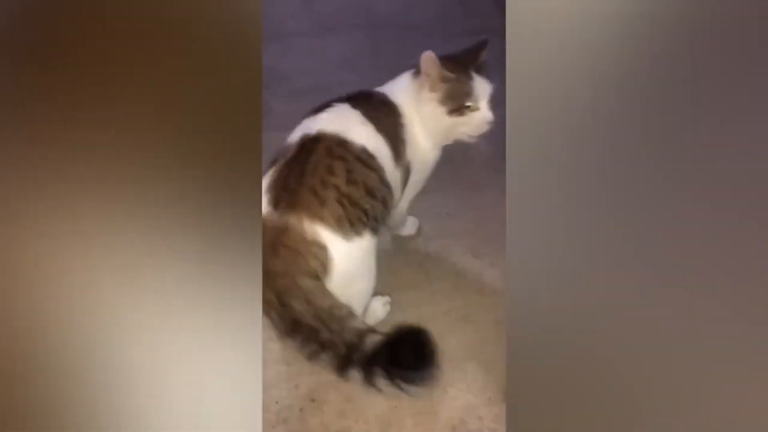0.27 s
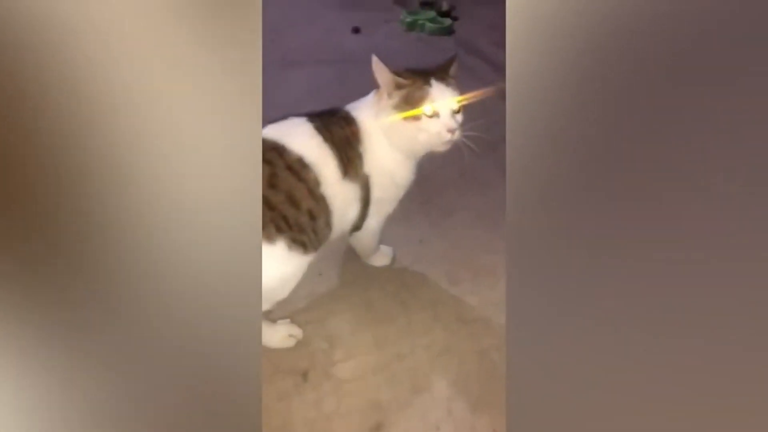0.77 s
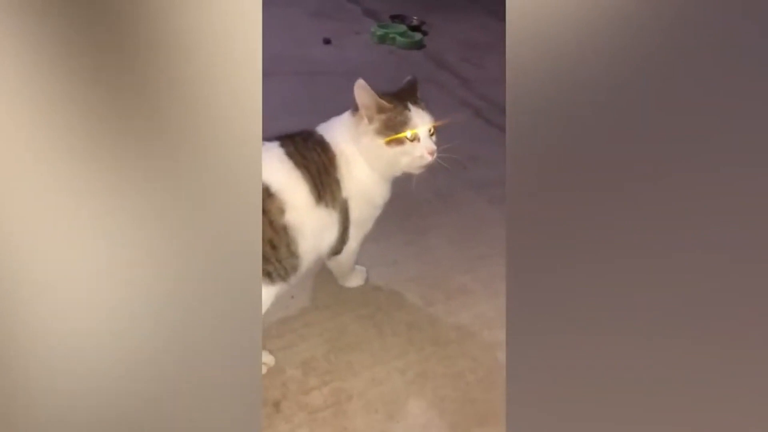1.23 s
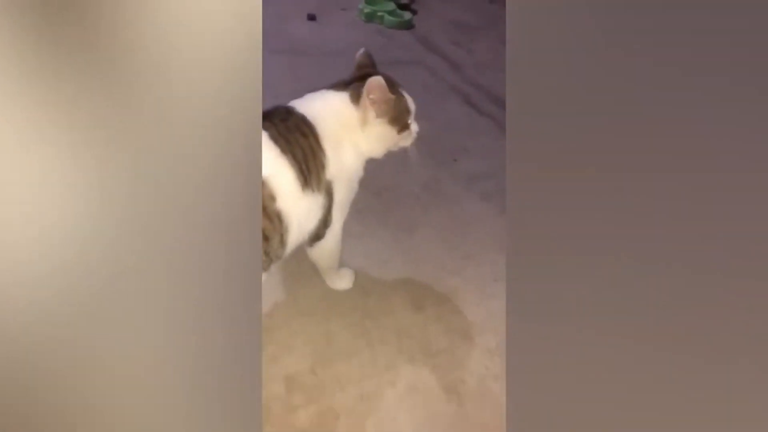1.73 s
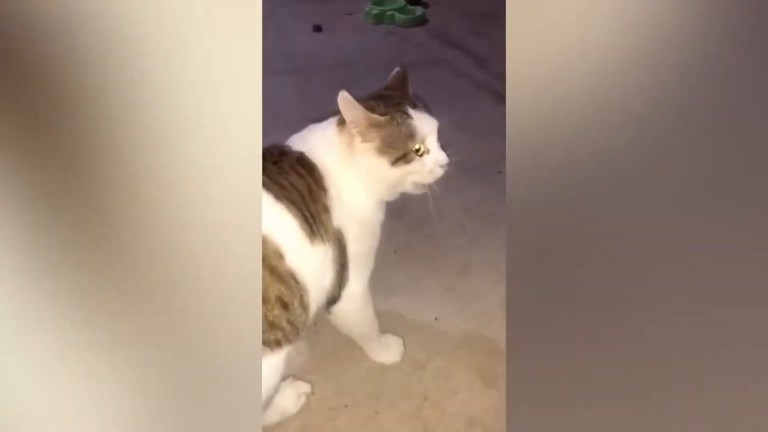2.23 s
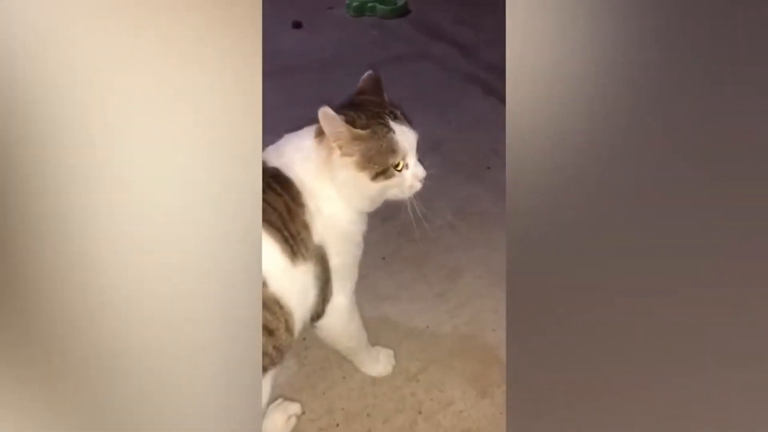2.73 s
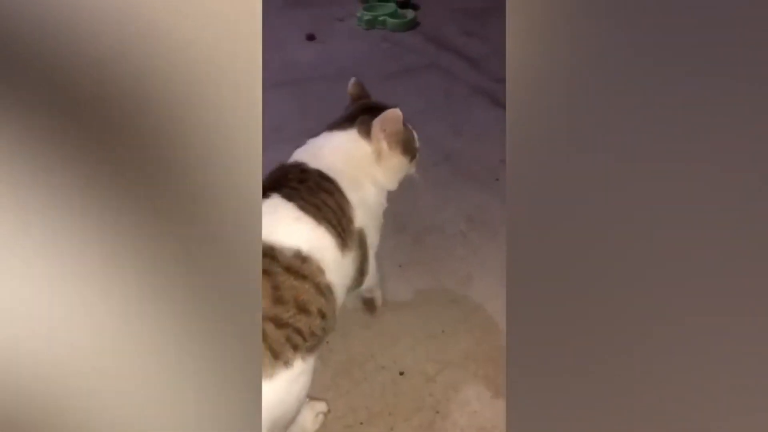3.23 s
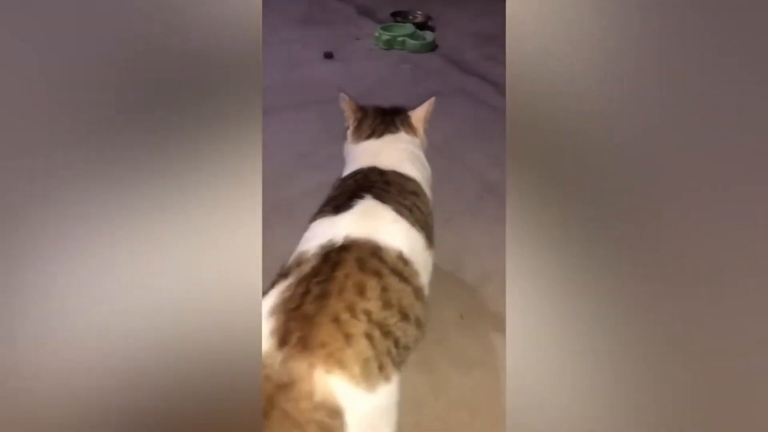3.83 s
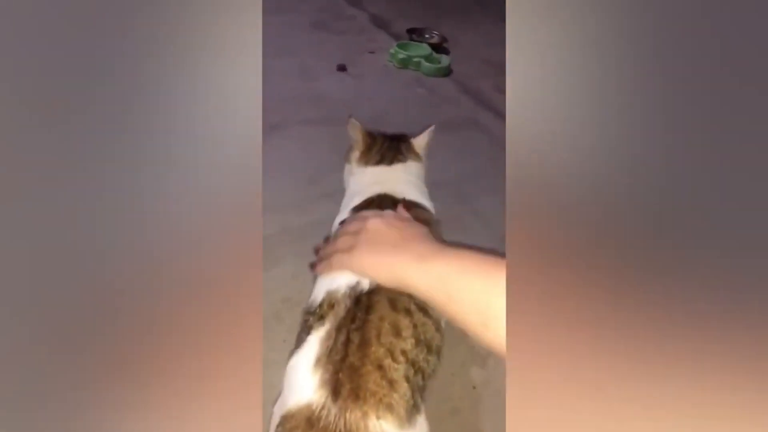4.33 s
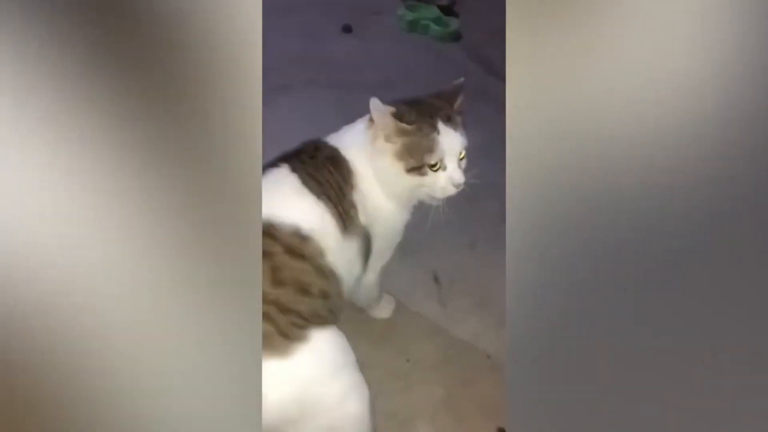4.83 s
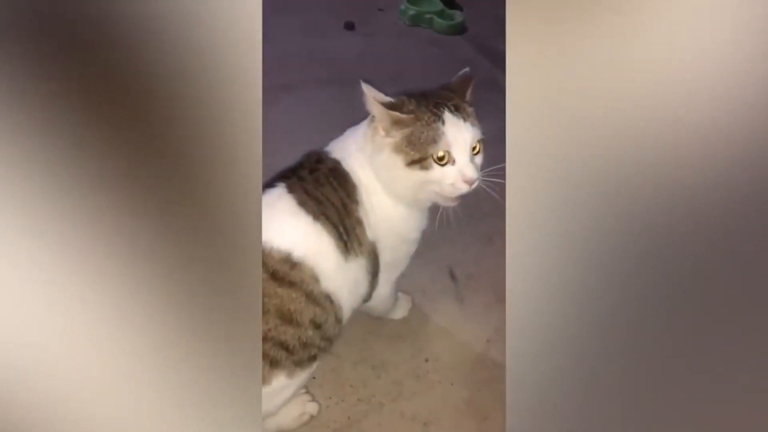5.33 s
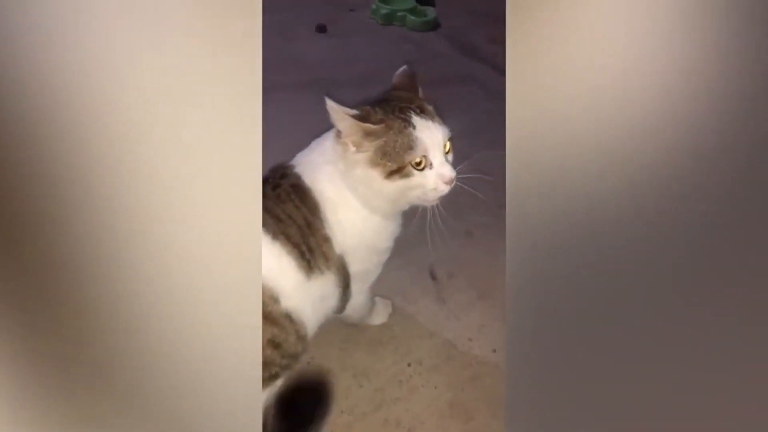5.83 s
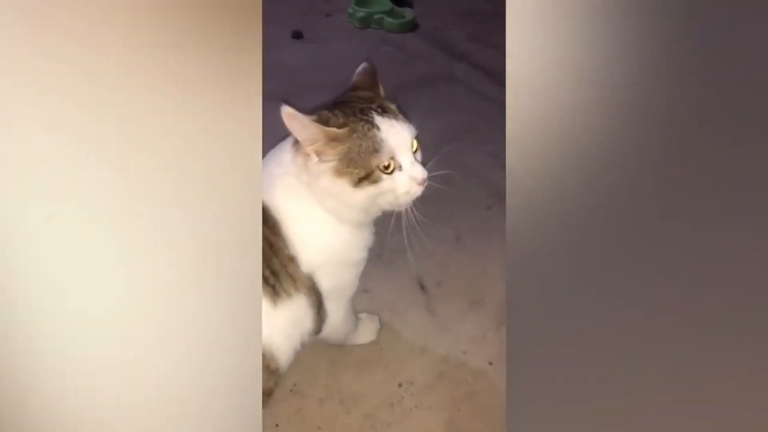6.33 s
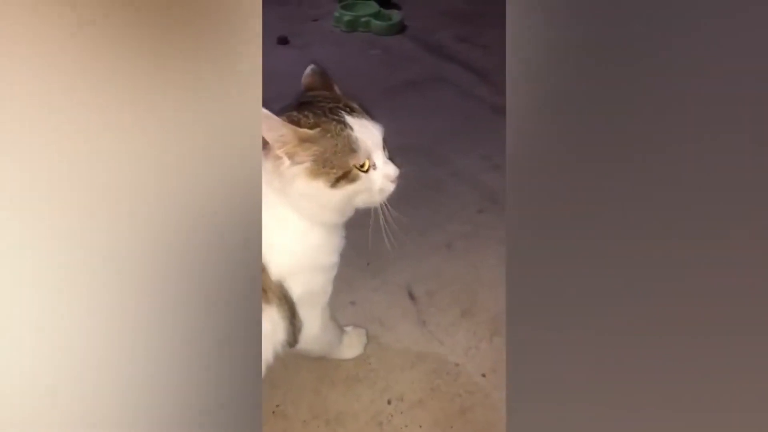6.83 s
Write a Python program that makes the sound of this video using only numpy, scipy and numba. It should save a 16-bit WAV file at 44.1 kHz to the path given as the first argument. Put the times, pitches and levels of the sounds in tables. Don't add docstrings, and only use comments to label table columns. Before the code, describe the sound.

A cat close by murmurs, gives a brief two-part meow, then two long loud yowls, with soft scuffs and pats on concrete.

```python
import sys
import numpy as np
from scipy import signal
from scipy.fft import rfft, irfft
from scipy.io import wavfile
from scipy.ndimage import uniform_filter1d
from numba import njit

SR = 44100
rng = np.random.default_rng(int(sys.argv[2]) if len(sys.argv) > 2 else 0)


def gain_from_decibels(decibels):
    exponent = np.asarray(decibels, float) / 20
    return 10 ** exponent


def master(y):
    cut = np.clip(np.atleast_2d(y).T, -1, 1)
    pcm = np.round(cut * 32767)
    wavfile.write(sys.argv[1], SR, pcm.astype(np.int16))


N = 312669


def cat():
    return calls() + onset_rasps() + murmur()


# [t/s, pitch f/Hz, level/dB, jaw resonance/multiple of pitch, brightness/dB]
MEOW_1 = [(0.15, 425.7, -52, 1.9, 20), (0.175, 443, -39, 1.9, 2.5), (0.21, 456, -31, 1.9, 9),
          (0.225, 463, -32, 2.29, 7.5), (0.305, 508.8, -25, 2.28, 5.5), (0.385, 476.3, -30, 2.26, 4),
          (0.425, 466, -27.5, 2.35, -5), (0.455, 452, -25, 2.33, -19)]
MEOW_2 = [(0.491, 422.4, -27, 1.79, -32), (0.519, 432, -29.5, 1.7, -24.5),
          (0.544, 439.6, -17.5, 1.93, -25.5), (0.592, 453.7, -20, 2.62, -14), (0.688, 462.3, -24, 2.34, -3),
          (0.76, 435, -26, 2.56, -12), (0.79, 391.6, -32.5, 1.62, -22.5), (0.819, 434, -49, 1.4, -6)]
ONSET = [(1.41, 170.3, -59, 1.11, -22), (1.42, 176.2, -34, 1.0, -20), (1.436, 224.8, -33.5, 1.1, -20),
         (1.447, 268.3, -40.5, 1.4, -7), (1.465, 267.8, -31.5, 1.3, -12.5), (1.48, 298.7, -39, 1.3, -14.5),
         (1.5, 325.2, -36, 1.3, -17.5), (1.52, 342.3, -36.5, 1.5, -16), (1.565, 376.8, -32, 1.44, -19.5)]
RISE = [(1.58, 374.6, -32, 1.6, -32.5), (1.644, 397, -23, 1.82, -24.5), (1.694, 408.4, -21.5, 1.81, -26),
        (1.729, 405.6, -26.5, 1.7, -19), (1.77, 420, -31.5, 1.6, -40), (1.87, 426.7, -23.5, 1.76, -31),
        (1.936, 450.7, -31, 1.58, -45), (2.003, 447.5, -34, 2.35, -34)]
OPENING = [(2.041, 440.6, -28, 2.07, -35), (2.074, 441.3, -16.5, 2.08, -16.5),
           (2.155, 475.4, -15.5, 1.75, -29), (2.172, 472, -18, 2.32, -16.5)]
YOW_1 = [(2.199, 491.6, -16.5, 2.47, -16), (2.301, 512.7, -17.5, 2.45, -10), (2.337, 515, -15, 2.5, -9),
         (2.365, 516, -19.5, 2.32, -9.5), (2.446, 507.9, -13.5, 2.28, -15), (2.48, 487, -13, 1.98, -25.5),
         (2.531, 506.7, -33, 1.55, -15.5)]
YOW_2 = [(2.549, 497.6, -35, 1.46, -20), (2.592, 498, -19.5, 1.9, -19.5), (2.618, 481.8, -9, 1.965, -26.5),
         (2.682, 494.5, -14.5, 2.48, -20), (2.73, 491.5, -14.5, 2.69, -14),
         (2.802, 495.8, -16.5, 2.53, -15.5), (2.864, 469, -12.5, 2.12, -20.5),
         (2.963, 472.5, -29, 1.53, -39), (3.153, 415, -26.5, 1.78, -21)]
MOAN_1 = [(3.199, 408, -38.5, 1.67, -37.5), (3.275, 390.5, -38.5, 1.34, -25), (3.329, 393, -32, 1.5, -16),
          (3.38, 369.2, -30, 1.53, -9), (3.415, 371, -35.5, 1.36, -13), (3.505, 382, -36.5, 1.33, -27.5),
          (3.69, 369.7, -35.5, 0.98, -30)]
MOAN_2 = [(3.76, 369.2, -37.5, 0.94, -28), (3.82, 372, -41.5, 1.48, -24.5), (3.95, 376, -34, 1.05, -39),
          (4.03, 371, -32, 0.94, -40), (4.131, 348.3, -39.5, 0.8, -27.5), (4.146, 350.4, -29.5, 1.07, -43),
          (4.255, 331.7, -54, 1.62, -9), (4.315, 324, -30.5, 0.96, -36), (4.36, 276, -50.5, 1.1, -25),
          (4.384, 332, -39.5, 1.01, -9.5), (4.43, 299, -67, 1.23, -23.9)]
CRY = [(4.81, 535, -15, 2.9, -11), (4.83, 538, -15, 2.7, -8), (4.89, 504.8, -17, 2.77, -6),
       (4.975, 513.5, -16, 2.77, -10.5)]
WAIL = [(5.029, 497.8, -18, 2.73, -9.5), (5.085, 523.7, -12, 2.79, -13.5),
        (5.125, 547.4, -12.5, 2.79, -14.5), (5.149, 551, -16, 2.72, -8.5), (5.261, 549.5, -15, 2.726, -8.5)]
PEAK = [(5.401, 530, -9, 2.85, -17.5), (5.43, 528.7, -7.5, 2.92, -21.5), (5.553, 526.8, -7, 2.917, -22.5),
        (5.635, 522, -12, 2.87, -15.5), (5.705, 513.5, -16.5, 2.77, -11)]
SLIDE = [(5.78, 487, -16.5, 2.56, -29), (5.955, 472.2, -15.5, 2.67, -17.5), (6.192, 448.9, -14, 2.54, -22),
         (6.436, 435.9, -12, 2.536, -22), (6.52, 433.1, -14.5, 2.6, -21), (6.764, 410, -15.5, 2.43, -21.5)]
CLOSE = [(6.782, 408.1, -19, 1.89, -18.5), (6.84, 416, -22.5, 1.82, -18), (6.949, 426.3, -22.5, 1.76, -18),
         (7.006, 407.7, -22, 1.85, -20.5), (7.085, 401.3, -18, 1.87, -21)]
PHRASES = [(MEOW_1, MEOW_2), (ONSET, RISE, OPENING, YOW_1, YOW_2, MOAN_1, MOAN_2),
           (CRY, WAIL, PEAK, SLIDE, CLOSE)]
# [t/s, cheek/multiple of pitch, cheek level/dB, throat ring/multiple of pitch, ring level/dB]
TONGUE_1 = [(.155, 6.3, -12, 12, -19.5), (.23, 6, -26, 12.6, -27), (.31, 6, -23, 11, -31.5),
            (.4, 6, -23, 11.5, -37), (.5, 6, 3, 14.5, -16), (.58, 6, 2, 15, -17.5), (.63, 6, 3, 12, -22),
            (0.669, 6, -2.5, 14.2, -23.5), (.72, 5.8, -22, 14.5, -45), (.82, 6, 7, 14, -30)]
TONGUE_2 = [(1.41, 6.2, -21, 20, -24), (1.57, 5, -13, 11, -18), (1.65, 5.55, 16.5, 10.8, -6.5),
            (1.72, 4.93, 17, 10.8, -19), (1.85, 5.4, 8, 9.5, -1.5), (2.1, 4.8, 21, 10, -7),
            (2.199, 5.7, -28.5, 10.1, -10), (2.3, 5.6, 2.5, 10.5, -22.5), (2.401, 5.28, -9.5, 11.1, -24),
            (2.65, 5.44, 1, 9.4, -6.5), (2.748, 5.1, -10, 11.26, -22), (2.85, 3.3, -22.5, 10.45, -17),
            (3.0, 6, -9, 8, -10.5), (3.15, 6.8, 2, 5.9, -32.5), (3.4, 6.95, 0, 14.4, -38),
            (3.8, 6.4, -20, 10, -8), (4.429, 5.8, 1, 9.2, -11)]
TONGUE_3 = [(4.81, 5.39, 5, 12, -28.5), (4.9, 5.32, 7.5, 11.1, -25), (5, 5.1, 8.5, 10.3, -25.5),
            (5.1, 5.63, 19.5, 10.7, -23), (5.2, 5.5, -1, 10.7, -22.5), (5.3, 5.57, 8, 12.7, -25),
            (5.4, 5.62, 15.5, 10.4, -26), (5.5, 5.6, 17, 10.5, -15), (5.6, 5.28, 12.5, 11, -24.5),
            (5.701, 4.92, 14, 10.6, -16), (5.8, 5.6, 3.5, 10.2, -3.5), (5.899, 4.9, 18, 10.4, -6.5),
            (6, 5, 19.5, 10, -12.5), (6.15, 5.08, 6.5, 9.9, -15), (6.5, 5.27, 1, 9.6, -13),
            (6.7, 5.3, 8, 9.85, -14), (6.9, 5.3, 13.5, 8.85, -12), (7.09, 5.53, -2, 9.8, -5)]
# [mouth resonance/multiple of pitch, breath level/dB,
# steepness of the lips above the jaw resonance/1, seventh partial/dB, palate resonance/dB]
COLOURS = [
    [(4.01, -29, 0.88, 1.5, 8), (4.01, -23, 1.21, -3, 10.5)],
    [(4.1, -18.5, 0.6, -1.5, 0), (4.01, -26, 1.17, -3.5, 0.5), (4.01, -17.5, 0.65, 1, 0),
     (4.01, -24, 0.88, -1.5, 0.5), (4.01, -26, 1.42, -5, -0.5), (4.6, -22.5, 0.73, 0, -3),
     (4.1, -22, 0.93, -1, 1)],
    [(4.01, -26.5, 1.67, 0, 1), (4.01, -17, 1.39, -1, 1), (4.01, -24, 2.65, -16.5, -2),
     (4.01, -22.5, 2.54, 3.5, -0.5), (4.01, -25, 2.01, 5, -2)],
]


def calls():
    out = np.zeros(N)
    for call in zip(PHRASES, (TONGUE_1, TONGUE_2, TONGUE_3), COLOURS):
        add(out, *yowl(*call), fade_s=0.00047)
    return out


# [t/s, length/s, second partial/dB, third partial/dB]
NOSE = [
    (1.483, 0.029, -10, 10.5),
    (3.62, 0.014, -9, -4),
    (3.765, 0.017, -10, 7),
    (3.945, 0.027, -17, 8),
]
# [f/Hz, level per Hz/dB]
BREATH = [(900, -21), (2000, -13.5), (3000, -8.5), (3900, -27.5), (5300, -9), (6300, -10.5), (7300, -15.5),
          (8300, -24), (11500, -29), (15500, -33)]
# [f/Hz, level/dB]
THROAT = [(1500, -9.5), (2400, -29.5), (3300, -25), (3800, -31.5), (4600, -26.5), (5500, -27),
          (6300, -18.5), (7200, -34.5), (9000, -44), (11500, -38.5), (13000, -42), (14500, -43),
          (15500, -46)]


def yowl(syllables, tongue, colours):
    i0, (hz, db, jaw, bright_db) = curves([row for rows in syllables for row in rows])
    n = len(hz)
    hz = uniform_filter1d(hz, SR // 60, mode="nearest")
    mouth, breath_db, lips, seventh_db, palate_db = vowel_glide(syllables, colours, i0, n)
    upper_db = db + bright_db
    partials = gain_from_decibels(db) * jaw_gains(jaw, lips)
    t = (i0 + np.arange(n)) / SR
    for s, length, second_db, third_db in NOSE:
        opening = np.exp(-((t - s) / length) ** 2)
        partials = partials * gain_from_decibels(np.outer([0, second_db, third_db], opening))
    wobble = 0.0011 * walk(n, 39.46)
    phase = 2 * np.pi * np.cumsum(hz * (1 + wobble)) / SR
    low = sum(gain * np.sin(k * phase + k) for k, gain in enumerate(partials, 1))
    upper = upper_partials(i0, hz, phase, tongue, mouth, seventh_db, palate_db)

    puffs = coloured(BREATH, n) * (1 + 0.86 * np.cos(phase)) * gain_from_decibels(1.1 * walk(n, 27))
    smear = low * unit(smooth_twice(rng.standard_normal(n), 200, 200))
    half_db = upper_db - 20 + 1.4 * (breath_db + 18) + 4.8 * walk(n, 52)
    half = partials[2] * gain_from_decibels(half_db) * np.sin(3 * phase / 2)
    open_db = upper_db - 2 * np.maximum(-67.0 - upper_db, 0)
    voiced = low + half + gain_from_decibels(open_db) * upper
    breath = gain_from_decibels(0.64 * upper_db - 10.5) * puffs + 0.5 * smear
    return i0, np.sqrt(2) * voiced + gain_from_decibels(breath_db) * breath


def upper_partials(i0, hz, phase, tongue, mouth, seventh_db, palate_db):
    n, hop = len(hz), 16
    s, *columns = np.transpose(tongue)
    slow_t = (i0 + np.arange(0, n, hop)) / SR
    cheek, cheek_db, ring, ring_db = (np.interp(slow_t, np.maximum.accumulate(s), c) for c in columns)
    pitch, m = hz[::hop], len(ring)
    mouth_hz, cheek_hz, ring_hz = (mouth * hz)[::hop], cheek * pitch, ring * pitch

    def fill(slow):
        return np.interp(np.arange(n), np.arange(m) * hop, slow)

    upper, power = 0, 0
    for k in range(4, 36):
        f = k * pitch
        gain = gain_from_decibels(shape_db(THROAT, f) + 2.5 * walk(m, 8 * hop))
        gain = gain + peak(f, mouth_hz, 260) + gain_from_decibels(cheek_db) * peak(f, cheek_hz, 300)
        power = power + gain ** 2 * np.clip((3500 - f) / 200, 0, 1)
        lift = (1 + gain_from_decibels(cheek_db)) * gain_from_decibels(-3.5 + 0.54 * (ring_db + 8)) if k > 6 else 1
        gain = gain * lift + gain_from_decibels(ring_db) * (1 + gain_from_decibels(cheek_db)) * peak(f, ring_hz, 400)
        gain = gain * gain_from_decibels(seventh_db[::hop] * (k == 7) + palate_db[::hop] * (k in (8, 9)))
        near_teeth = np.exp(-(np.minimum(f - 6000, 0) / 1800) ** 2)
        flutter_db = 2.5 * near_teeth * walk(m, 150 * hop)
        patches_db = 4 * (k > 14) * walk(m, 4 * hop)
        gain = gain * gain_from_decibels(flutter_db + patches_db)
        blur = np.clip((f - 4200) / 4000, 0, 2.6) * 1.1 * walk(m, 110 * hop)
        upper = upper + fill(gain * (f < 15500)) * np.sin(k * phase + k * k + fill(blur))
    return upper / fill(np.sqrt(power))


def jaw_gains(jaw, lips):
    away = np.arange(1, 4)[:, None] - jaw
    below = (1 + (away / 0.25) ** 2) ** (-2.09 / 2)
    above = (1 + (away / 0.089) ** 2) ** (-lips / 2)
    gain = np.where(away < 0, below, above)
    return gain / np.sqrt(np.sum(gain ** 2, axis=0))


def vowel_glide(syllables, vowels, i0, n):
    glide_s = 0.081
    starts = [rows[0][0] * SR - i0 for rows in syllables[1:]]
    held = np.array(vowels, float)[np.searchsorted(starts, np.arange(n))]
    return uniform_filter1d(held, int(glide_s * SR), axis=0, mode="nearest").T


# [t/s, level/dB, fold slaps f/Hz, mouth resonance f/Hz, jaw resonance share/dB]
RASP = [
    [(0.02, -42, 265.4, 1300, 9), (0.06, -41, 232.8, 1360, 13), (0.1, -28, 252, 1390, 10),
     (0.135, -29.5, 270.9, 1720, 1.5), (0.165, -24, 288.7, 1830, -9.5), (0.195, -24, 301, 1910, -6),
     (0.225, -32.5, 298, 1920, -12), (0.29, -46, 302, 2130, -4)],
    [(4.748, -47.5, 330, 1450, 1), (4.775, -21.5, 345.7, 1400, -3.5), (4.797, -13.5, 380.4, 1570, -7.5),
     (4.815, -17, 424, 1720, -6), (4.83, -19, 456.6, 1860, -12), (4.845, -29, 490, 1700, -16),
     (4.9, -32.5, 476, 1600, -5)],
]
# [start f/Hz, end f/Hz, slap jitter/0-1, air share/1]
RASP_JAW = [
    (936, 1070, .05, 0.057),
    (678, 1170, .13, 0.15),
]


def onset_rasps():
    out = np.zeros(N)
    for table, jaw in zip(RASP, RASP_JAW):
        add(out, *rasp(table, jaw))
    return out


def rasp(table, jaw):
    i0, (db, pulse_hz, mouth_hz, jaw_db) = curves(table, smooth_s=0.0079)
    n = len(db)
    jaw_from_hz, jaw_to_hz, jitter, air = jaw
    chance = rng.standard_normal((200, 2))
    cycles = np.cumsum(pulse_hz) / SR
    at = np.searchsorted(cycles, np.cumsum(np.exp(jitter * chance[:, 0])))
    drive = air * rng.standard_normal(n)
    drive[at[at < n]] += gain_from_decibels(1.5 * chance[at < n, 1])
    soft = smooth_twice(drive, 9, 11)
    jaw_hz = np.linspace(jaw_from_hz, jaw_to_hz, n)
    out = twice(soft, mouth_hz, 380.0) + gain_from_decibels(jaw_db) * twice(soft, jaw_hz, 278.0)
    # f/Hz, width/Hz, share/dB
    for hz, width, share_db in ((330, 420.0, -19.0), (2780, 480.0, -16.5),
                                (4070, 1900.0, -35), (5680, 2100.0, -31.0)):
        centre = hz * np.ones(n)
        out = out + gain_from_decibels(share_db) * band(twice(drive, centre, width), centre, width)
    return i0, gain_from_decibels(db) * out / np.sqrt(uniform_filter1d(out ** 2, size=600, mode="reflect"))


# [t/s, pitch f/Hz, level/dB]
MURMUR = [(0.0, 294, -33.5), (0.064, 214, -33), (0.2, 390, -42)]


def murmur():
    out = np.zeros(N)
    i0, (hz, db) = curves(MURMUR)
    phase = 2 * np.pi * np.cumsum(hz * (1 + 0.111 * walk(len(hz), 92.5))) / SR
    add(out, i0, np.sqrt(2) * gain_from_decibels(db) * (np.sin(phase) + 0.24 * np.sin(2 * phase)))
    return out


def handling():
    return scuffs() + pats() + fur_stroke()


# [t/s, peak level/dB, centre f/Hz, length/s, share of bass/dB]
SCUFFS = [(0.803, -61, 4530, 0.022, 17.5), (1.422, -53.5, 4820, 0.033, 8), (1.472, -30, 3930, 0.057, -25),
          (1.755, -42, 4600, 0.055, 8), (3.023, -30, 5650, 0.024, -4), (3.043, -27.5, 5780, 0.076, -15),
          (3.205, -40.5, 4900, 0.074, -40.5), (3.312, -38.5, 4820, 0.039, 4), (3.427, -35, 3224, 0.015, 12),
          (3.437, -33.5, 4303, 0.055, -13.5), (3.48, -41.5, 4310, 0.065, -14),
          (4.048, -39.5, 3610, 0.021, -14), (4.148, -37, 3585, 0.0253, -27),
          (4.38, -37.5, 4744, 0.039, 0.5), (4.582, -50, 3700, 0.02, -9), (4.617, -46, 3700, 0.05, -9),
          (4.731, -34.5, 3630, 0.015, 4), (4.744, -40.5, 4160, 0.085, 4)]


def scuffs():
    out, t = np.zeros(N), np.arange(int(.15 * SR)) / SR
    ones = np.ones(len(t))
    for s, db, hz, length, bass_db in SCUFFS:
        grit = rng.standard_normal(len(t)) * gain_from_decibels(3.5 * rng.exponential(size=len(t)))
        bright = unit(band(grit, hz * ones, 9000.))
        dull = unit(band(grit, 2000 * ones, 1700.0))
        drag = np.sin(np.pi * np.clip(t / max(length, .004), 0, 1) ** 0.43)
        envelope = drag + 0.04 * np.exp(-t / 0.019)
        add(out, int(s * SR), gain_from_decibels(db - 11.5) * (bright + gain_from_decibels(bass_db) * dull) * envelope, fade_s=0.014)
    return out


# [t/s, peak level/dB, thud f/Hz, slap level/dB]
PATS = [
    (3.114, -35, 230, -9),
    (3.233, -49, 217.3, 12),
    (3.299, -50, 290, 9),
    (3.421, -31.5, 174.5, -1),
    (3.493, -36.5, 244.5, 0),
    (4.595, -28, 180, 4),
    (4.619, -26, 147, 1.5),
    (4.653, -35.5, 162, -5),
    (4.735, -39, 303, 4.5),
    (5.982, -35.5, 210, -20),
]


def pats():
    out, t = np.zeros(N), np.arange(int(.15 * SR)) / SR

    def patter(hz, width):
        return unit(twice(rng.standard_normal(len(t)), hz * np.ones(len(t)), width))

    for s, db, hz, slap_db in PATS:
        thud = np.sin(2 * np.pi * hz * t) + 0.3 * patter(360, 300.0)
        thud = thud * np.exp(-t / 0.012) * (1 - np.exp(-t / 0.0022))
        slap = np.sin(2 * np.pi * 1350 * t) + 0.78 * np.sin(2 * np.pi * 1080 * t)
        slap = slap + 0.17 * patter(2350, 500.0) + 0.089 * patter(3700, 900.0)
        slap = slap * np.exp(-t / 0.005) * (1 - np.exp(-t / 0.0017))
        add(out, int(s * SR), gain_from_decibels(db) * (thud + gain_from_decibels(slap_db) * slap), fade_s=0.00087)
    return out


# [t/s, level/dB]
STROKE = [
    (4.48, -73),
    (4.54, -58),
    (4.6, -50.5),
    (4.65, -56.5),
    (4.73, -65.5),
]


def fur_stroke():
    out = np.zeros(N)
    i0, (db,) = curves(STROKE)
    n = len(db)
    brush = sum(unit(twice(rng.standard_normal(n), hz * np.ones(n), 260.0)) for hz in (1080, 1420))
    add(out, i0, gain_from_decibels(db) * brush)
    return out


def room(x):
    t60_s, level_db, top_hz = 0.38, -18, 3100
    t = np.arange(int(.7 * SR)) / SR
    tail = coloured([(200, -6), (600, 0), (top_hz, 0), (9000, -14)], len(t))
    tail = tail * np.exp(-np.log(1000) * t / t60_s) * np.clip(t / 0.0051, 0, 1)
    return gain_from_decibels(level_db) * signal.fftconvolve(x, tail / np.sqrt(np.sum(tail ** 2)))[:N]


def night(loud):
    duck = (1 + uniform_filter1d(np.abs(loud), 4000) / 0.32) ** -.8
    return (night_hum() + rustle()) * duck + traffic()


# [f/Hz, level per Hz/dB]
NIGHT = [(53, -49), (90, -3), (227, -3.5), (415, -10), (653, -15), (743, -10.5), (2230, -18.5), (2540, -23),
         (3360, -23), (15500, -44)]
# [t/s, level/dB]
HUSH = [(0.0, 6.5), (0.85, -2.5), (1.05, -2), (1.3, -6), (1.42, -2.5), (1.6, 1.5), (2.5, -1), (3.2, 0.5),
        (4.4, -1.8), (7.09, 0.1)]


def night_hum():
    hum = coloured(NIGHT, N) * gain_from_decibels(-54 + walk(N, 8))
    bass = smooth_twice(hum, 70, 70)
    return bass + (hum - bass) * gain_from_decibels(np.interp(np.arange(N) / SR, *np.transpose(HUSH)))


# [t/s, level/dB]
RUSTLE = [(0.0, -80), (0.51, -87.5), (0.81, -94.5), (1.4, -81.5), (1.97, -55), (2.9, -56.5), (3.37, -53),
          (3.63, -65), (4.15, -58.5), (4.68, -64.5), (4.95, -57), (5.15, -57.5), (7.09, -55.5)]


def rustle():
    db = np.interp(np.arange(N) / SR, *np.transpose(RUSTLE))
    hiss = coloured([(1500, -26.5), (3000, -3), (4200, 0.0), (6000, -4.5), (14000, -9.0), (16000, -2.5)], N)
    return hiss * gain_from_decibels(db + 1.0 + 0.92 * walk(N, 11))


# [t/s, level/dB]
RUMBLE = [(0.0, -40), (0.12, -61.5), (2.13, -59), (2.25, -69), (2.84, -54.5), (6.44, -62), (7.09, -49.5)]


def traffic():
    db = np.interp(np.arange(N) / SR, *np.transpose(RUMBLE))
    return coloured([(28, -23.5), (45, 4.5), (100, 3.0), (140, -32.5)], N) * gain_from_decibels(db - 4.0)


def unit(x):
    return x / np.sqrt(np.mean(x ** 2))


def smooth_twice(x, first, second, axis=-1):
    return uniform_filter1d(uniform_filter1d(x, first, axis=axis), second, axis=axis)


def curves(table, smooth_s=.01):
    s, *columns = np.transpose(table)
    s_rising = np.maximum.accumulate(s)
    i0, i1 = int(s[0] * SR), min(int(s[-1] * SR), N)
    t = np.arange(i0, i1) / SR
    size = int(smooth_s * SR)
    return i0, [uniform_filter1d(np.interp(t, s_rising, c), size, mode="nearest") for c in columns]


def add(out, i0, x, fade_s=0.00145):
    k = np.arange(len(x))
    fade = np.clip(np.minimum(k + 1, len(x) - k) / (fade_s * SR), 0, 1)
    out[i0:i0 + len(x)] += (x * fade)[:len(out) - i0]


def shape_db(table, hz):
    f, db = np.transpose(table)
    return np.interp(np.log(np.maximum(hz, 1)), np.log(f), db)


def coloured(table, n):
    spectrum = rfft(rng.standard_normal(n))
    hz = np.arange(len(spectrum)) * SR / n
    return unit(irfft(spectrum * gain_from_decibels(shape_db(table, hz)), n))


def walk(n, rate):
    k = int(SR / rate)
    return 1.3 * smooth_twice(np.repeat(rng.standard_normal(n // k + 1), k), k, k)[:n]


@njit
def band(x, hz, width):
    y, b, l = np.empty(len(x)), 0., 0.
    for i in range(len(x)):
        g, k = np.tan(np.pi * hz[i] / SR), width / hz[i]
        v = (b + g * (x[i] - l)) / (1 + g * (g + k))
        b, l, y[i] = 2 * v - b, l + 2 * g * v, k * v
    return y


def twice(x, hz, width):
    return band(band(x, hz, width), hz, width)


def peak(f, hz, width):
    return 1 / (1 + ((f - hz) / width) ** 2) ** 2


def thin(x):
    f, t, z = signal.stft(x, SR, nperseg=2048, noverlap=1536)
    power = uniform_filter1d(np.abs(z) ** 2 + 1e-18, size=3, axis=1)
    around, here = (uniform_filter1d(power, size=size, axis=0) for size in (25, 5))
    gap_db = 10 * np.log10(around / here)
    patches = smooth_twice(rng.standard_normal(z.shape), 12, 1, axis=0)
    patches = uniform_filter1d(patches, size=22, axis=1)
    masked = np.clip((10 * np.log10(power.sum(axis=0)) + 37) / 8, 0, 1)
    middle = np.clip((f - 1500) / 900, 0, 1) * np.clip((5700 - f) / 900, 0, 1)
    first_gap = np.clip(1.4 - np.abs(f - 640) / 150, 0, .8)
    where = (middle + first_gap)[:, None] * masked
    chosen = np.clip(4 * (patches / patches.std() - 0.05 - 2 * (1 - where)), 0, 1)
    holes = np.clip(gap_db - 2.0, 0, 1) * chosen
    wide = uniform_filter1d(uniform_filter1d(patches, size=24, axis=0), size=14, axis=1)
    air = np.clip(wide / wide.std() - 0.6, 0, 1.5) * np.clip((f - 7500) / 1500, 0, 1)[:, None]
    return signal.istft(z * gain_from_decibels(-24 * holes - 8.5 * air), SR, nperseg=2048, noverlap=1536)[1][:N]


def scene():
    near = cat() + handling()
    return (near + room(near) + night(near))[None]


def band_limit(x):
    return signal.sosfilt(signal.butter(12, 15560, fs=SR, output="sos"), x)


def record(dry):
    mix = thin(np.tanh(0.6 * dry[0]) / 0.59)[None]
    return band_limit(mix)


dry = scene()
out = record(dry)
master(out)
```